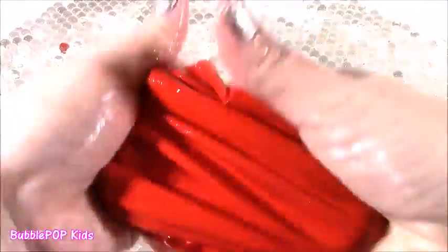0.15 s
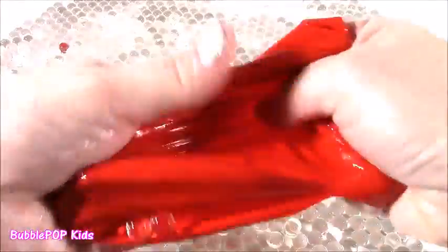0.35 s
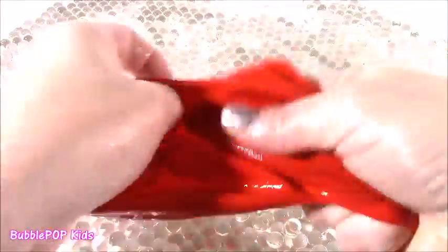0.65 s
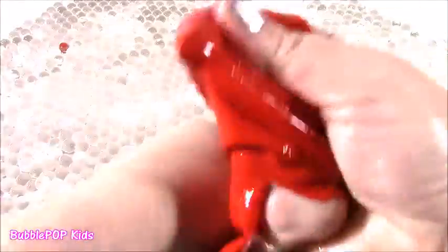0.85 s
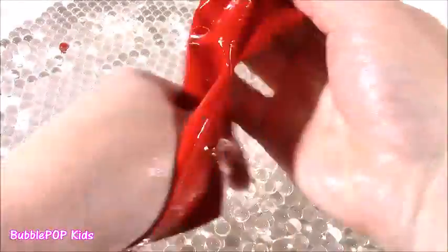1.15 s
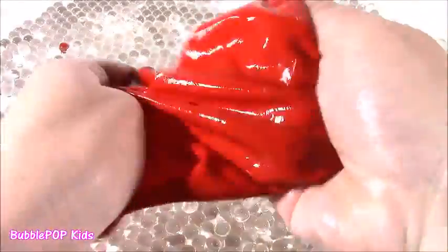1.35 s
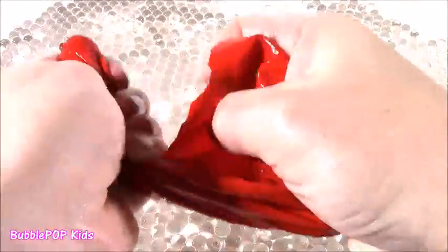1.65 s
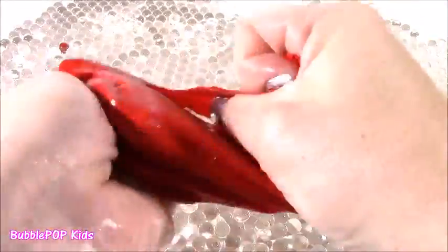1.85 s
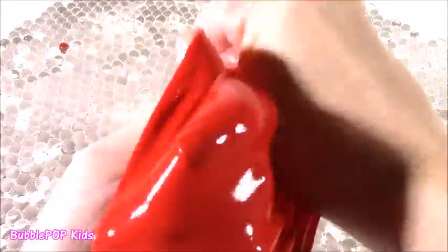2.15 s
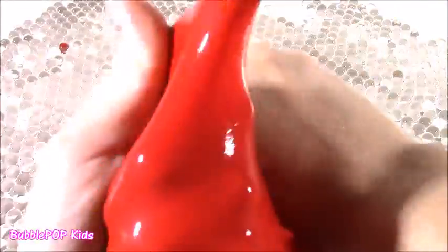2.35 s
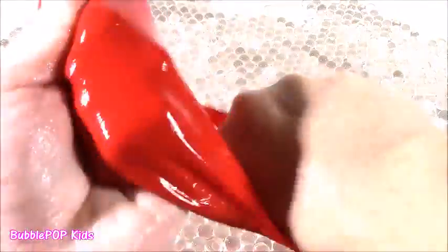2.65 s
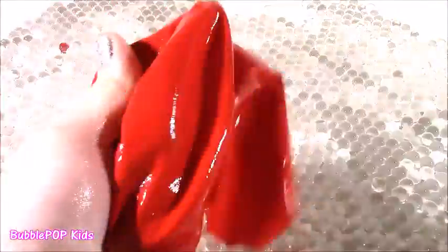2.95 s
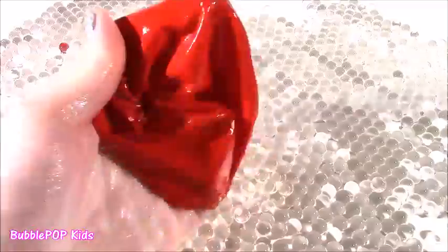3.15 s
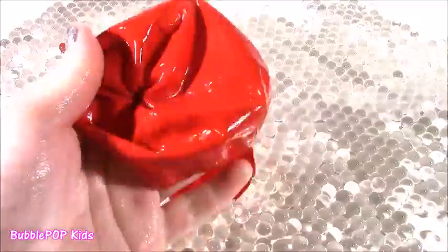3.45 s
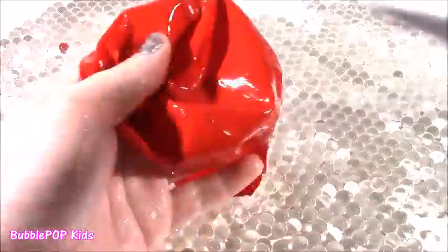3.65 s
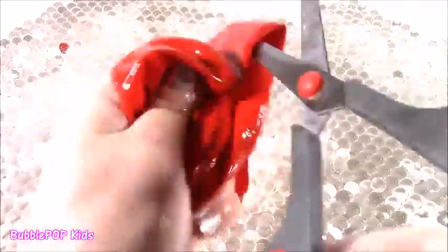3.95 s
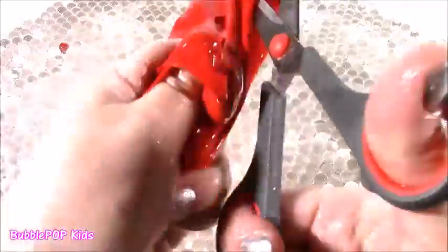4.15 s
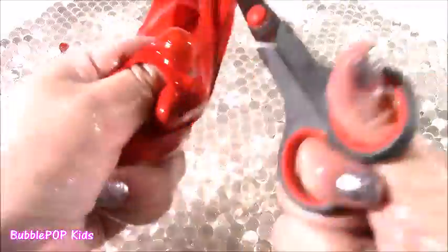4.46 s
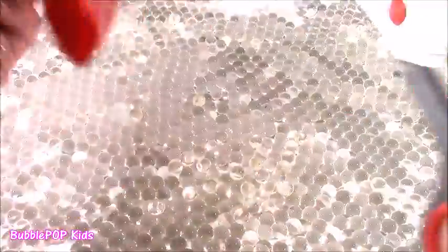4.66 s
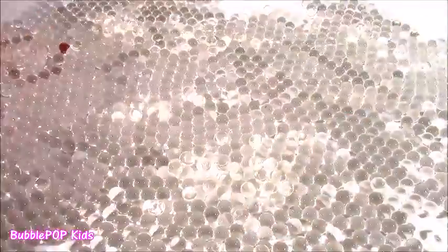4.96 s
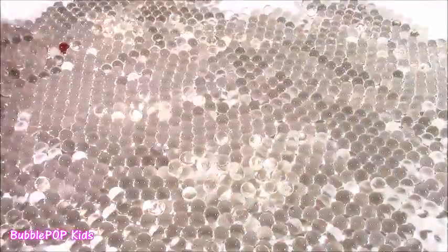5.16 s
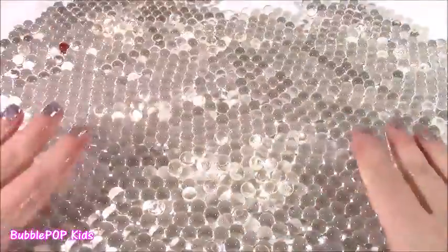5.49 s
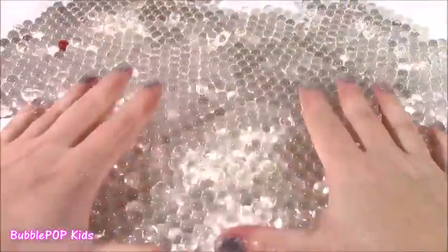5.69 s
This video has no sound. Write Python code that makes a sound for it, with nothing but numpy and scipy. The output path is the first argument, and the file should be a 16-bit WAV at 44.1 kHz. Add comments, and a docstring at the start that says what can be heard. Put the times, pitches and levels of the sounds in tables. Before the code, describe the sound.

Very close and nearly mono in a small quiet room, wet hands knead a limp rubber balloon: dull flexing, sticky rubbing, fine crackle, bright snaps and small squelches. Around three seconds the scissors knock and scrape on a hollow table, then tick and bite through the rubber. They clatter down sharply at five seconds, and quiet room tone with faint hiss follows.

```python
"""Wet hands knead a slack balloon that held water beads: its rubber flexes, rubs, snaps and squelches.
Slips and releases are filtered pulses and noise; each squelch adds a short sine for the flopping skin.
Scissors knock and scrape on a hollow table, by noise and decaying modes, snip the rubber and clatter down.
The sound is near and almost mono in a small room, over low room tone; faint hiss swells at the very end."""
import sys
import numpy as np
from scipy import signal
from scipy.fft import rfft, irfft, next_fast_len
from scipy.io import wavfile
from scipy.ndimage import map_coordinates

SR = 44100
rng = np.random.default_rng(int(sys.argv[2]) if len(sys.argv) > 2 else 0)


def generate_wav(signal):
    """Clip the signal to [-1, 1] and save it as 16-bit WAV at the path in sys.argv[1]."""
    frames = np.transpose(np.atleast_2d(signal))
    scaled = np.clip(frames, -1, 1) * 32767
    pcm = np.round(scaled).astype(np.int16)
    wavfile.write(sys.argv[1], SR, pcm)


N = 256882  # length in samples

# Grip on the balloon between squeezes, until it is put away: [start_s, rub_level_db]
GRIP_LEVEL = [(0, -56), (1.35, -53.5), (1.87, -61), (2.1, -58.5), (2.45, -69), (2.85, -56.5), (3.14, -65.5),
              (3.7, -65.5), (4.3, -64), (4.88, -71), (5.0, -58.5), (5.05, -85)]
# Squeezes and tugs, each building to a peak and letting go:
# [peak_s, build_s, release_s, flex_level_db, rub_level_db, crackle_level_db]
SQUEEZES = [(0.102, 0.072, 0.089, -46, -48.5, -68.5), (0.18, .02, .05, -48, -42.5, -46.5),
            (0.48, .38, .06, -44.5, -42.5, -43), (0.569, 0.056, 0.064, -71, -48.5, -41.5),
            (0.658, .06, .09, -41, -42.5, -49), (0.73, .14, .10, -45.5, -43, -37),
            (0.822, .025, .05, -70, -42, -38), (1.012, .11, 0.099, -50, -47.5, -50.5),
            (1.281, .22, .15, -44.5, -41.5, -53), (1.52, 0.27, 0.056, -44.5, -44, -47.5),
            (1.699, 0.26, 0.078, -48, -44, -45.5), (1.79, 0.058, .06, -52.5, -44.5, -43),
            (1.96, .06, .03, -49, -43.5, -52), (2.05, .04, .11, -47.5, -48, -43.5),
            (2.172, .03, .06, -45, -50.5, -57), (2.268, .05, 0.18, -66, -48, -41.5),
            (2.578, .02, .10, -57, -48, -43), (2.68, 0.065, 0.046, -53, -34.5, -36.5),
            (2.75, 0.12, .06, -42.5, -42.5, -43), (2.85, 0.078, 0.14, -47.5, -49, -42.5),
            (2.99, 0.11, .15, -39.5, -42, -48), (3.43, .28, 0.27, -54.5, -46, -45.5),
            (4.06, 0.031, 0.12, -53, -42.5, -41.5), (4.129, 0.095, 0.02, -69, -52, -52),
            (4.191, 0.02, 0.033, -52, -47, -51), (4.47, 0.085, 0.061, -44.5, -39, -41),
            (4.62, 0.043, 0.14, -68, -66, -43), (4.72, 0.2, 0.097, -45, -39, -53),
            (4.83, 0.022, 0.11, -72, -50.5, -52)]
# Spectrum of the dully flexing skin: [frequency_hz, density_db]
FLEX_SPECTRUM = [(25, -34), (70, -24.5), (130, -12), (280, -3.5), (420, -1), (750, -8.5), (1300, -12),
                 (2500, -17), (6000, -55)]
# Spectrum of wet fingers rubbing rubber: [frequency_hz, density_db]
RUB_SPECTRUM = [(200, -43), (700, -3), (1400, -2), (2600, -3.5), (3800, 1.5), (5200, -1), (8000, -16.5),
                (16000, -29)]
# Spectrum of fingers coming off the rubber in fine crackle: [frequency_hz, density_db]
CRACKLE_SPECTRUM = [(800, -44.5), (3000, -12), (5000, -5.5), (7500, -5.5), (12500, 0), (16000, -7)]
# Spectrum of the room tone: [frequency_hz, density_db]
ROOM_TONE_SPECTRUM = [(25, -25), (70, -24.5), (160, -10.5), (270, -5.5), (450, -3), (900, -9),
                      (2000, -15.5), (5000, -20.5), (16000, -34)]
# Spectrum of the microphone hiss: [frequency_hz, density_db]
HISS_SPECTRUM = [(200, -6.5), (800, -30), (3000, 0.5), (9000, -3.5), (13000, -7), (16000, -11)]
# Hiss, swelling at the end: [start_s, level_db]
HISS_LEVEL = [(5.57, -87), (5.61, -58), (5.82, -57.5)]
# Span in which both hands work the rubber: (start_s, end_s)
KNEADING_SPAN = (0.055, 3.05)
# Single wet folds of rubber pulling apart: [start_s, level_db, centre_hz, width_octaves]
SNAPS = [(0.0963, -34, 2730, 0.53), (0.1735, -27.5, 13300, .18), (0.2619, -32, 3390, 1.4),
         (0.3654, -23, 11500, 0.32), (0.3737, -30.5, 11600, 1.1), (0.4135, -26, 6860, 0.79),
         (0.4652, -29, 5450, 0.67), (0.4899, -22, 6380, 0.92), (0.5683, -22.5, 4800, 0.33),
         (0.5813, -30, 8550, 0.46), (0.735, -16, 11900, .18), (0.7365, -18, 9300, 0.42),
         (0.778, -23.5, 10000, 0.53), (0.8144, -27, 7630, 0.64), (0.9189, -14, 7500, 0.31),
         (1.0089, -32.5, 4650, 0.62), (1.0527, -32, 5500, 0.72), (1.1988, -32, 9650, 0.62),
         (1.2225, -21.5, 12100, .15), (1.2669, -22, 3140, 0.29), (1.2755, -18.5, 2490, .16),
         (1.3075, -27.5, 2750, 0.41), (1.3802, -31.5, 4260, 0.23), (1.4457, -27, 3400, 0.27),
         (1.62, -29.5, 3560, 0.37), (1.755, -31.5, 3300, 0.47), (1.6408, -25, 7090, 0.58),
         (1.7805, -29, 5500, .48), (1.7926, -28, 4680, 1.4), (2.0182, -12.5, 7340, 0.46),
         (2.0249, -20, 8500, .35), (2.0451, -19.5, 3940, 0.55), (2.1166, -36, 3800, 0.92),
         (2.1999, -29, 10000, 0.42), (2.4367, -37, 10310, 0.55), (2.481, -32, 3570, 0.44),
         (2.6117, -26.5, 3480, 0.85), (2.6456, -27.5, 5100, 0.18), (2.6698, -23.5, 7750, .3),
         (2.7419, -23.5, 5200, .17), (2.8407, -17.5, 5640, 1.4), (2.8971, -27, 4000, 0.15),
         (2.9798, -19.5, 2960, 0.78)]
# Single pockets of air and water squeezed out, before the common lift: [start_s, level_db, centre_hz]
SQUELCHES = [(0.184, -32, 545), (0.221, -31.5, 1040), (0.235, -32, 1720), (0.402, -27.5, 495),
             (0.414, -27.5, 556), (0.473, -27, 470), (0.633, -29, 1210), (0.657, -17.5, 1800),
             (0.666, -21.5, 1160), (0.716, -23, 1570), (1.276, -25, 1850), (1.308, -28.5, 1260),
             (1.415, -32.5, 460), (1.523, -30.5, 950), (1.564, -26, 1210), (1.962, -27.5, 670),
             (2.045, -23.5, 1680), (2.171, -24.5, 1100), (2.174, -24, 1240), (2.579, -34.5, 1220),
             (2.679, -28.5, 810), (2.8405, -27.5, 1550), (2.937, -27.5, 1320), (2.979, -25, 1650),
             (3.256, -27, 856), (3.842, -39.5, 1210), (3.955, -37, 920), (4.306, -30, 610),
             (4.46, -30.5, 1630), (4.716, -28, 1890)]
# Scissors striking the table, before the common lift:
# [start_s, level_db, brightness_hz, board_ring_db, steel_ring_db]
KNOCKS = [(3.175, -17, 2020, 2, -9), (5.032, -8, 13700, -4.5, -1), (5.0604, -18.5, 4500, -17, -6),
          (5.3215, -18.5, 10400, -6.5, -17), (5.3311, -19.5, 10200, -24, -10),
          (5.335, -17.5, 7500, -9, -12), (5.376, -33.5, 14000, -14, -18), (5.504, -41.5, 2500, -7, -22)]
# Spectrum of the contact between scissors and table: [frequency_hz, density_db]
CONTACT_SPECTRUM = [(30, -46), (110, -34), (220, -15), (500, -5.5), (800, -15.5), (1300, -2), (1650, -0.5),
                    (2300, 1), (2900, 9), (3500, -2), (4600, 1.5), (7000, -7.5), (11000, -8.5), (16000, -7)]
# Modes of the table board, before damping by the cloth: [frequency_hz, level_db, t60_s]
BOARD_MODES = [(188, -17, .14), (226, -16, .14), (385, -12, .15), (437, -10, .11), (481, -12, .16),
               (637, -10, .17), (735, -6, .06), (1051, -2, .1), (1185, -7, .1), (1415, -3, .085),
               (1545, -14, .1), (1835, -7, .07)]
# Modes of the scissors, before damping by the cloth: [frequency_hz, level_db, t60_s]
STEEL_MODES = [(997, -9, .2), (1059, 0, .125), (2010, -8, .05), (2555, -9, .14), (2770, -7, .14),
               (2875, -8, .14), (2942, -6, .12), (3093, -8, .11), (4680, -15, .1), (6410, -11, .055),
               (8211, -22, .14)]
# Blades ticking and biting through rubber: [start_s, level_db, centre_hz, width_octaves]
SNIPS = [(3.2541, -27.5, 2740, 0.53), (3.3491, -22.5, 5130, 0.63), (3.4474, -23.5, 7100, 0.43),
         (3.486, -25.5, 6100, 0.7), (3.5659, -31.5, 6000, 0.75), (4.002, -39.5, 5970, 1.4),
         (4.0657, -27.5, 9400, .72), (4.1254, -32, 4900, .18), (4.1823, -30, 4570, .16),
         (4.2, -32, 4670, .13), (4.2626, -40, 5360, 1.5), (4.3629, -31, 10300, 0.53),
         (4.3983, -36, 5250, 0.49), (4.4618, -22, 6500, 1.1), (4.4668, -21.5, 5800, .6),
         (4.5032, -27.5, 11000, 0.39), (4.6187, -28, 3900, 0.57), (4.639, -31.5, 9690, 1.4),
         (4.695, -6, 4450, .17), (4.7168, -21, 4800, 0.62), (4.8168, -32.5, 5400, 0.37),
         (4.9326, -37.5, 4190, .15), (5.2847, -35.5, 3150, 0.27)]
# Scissors sliding on the table: [start_s, length_s, level_db]
SLIDES = [(3.266, 0.18, -38.5), (5.192, 0.017, -47), (5.305, 0.01, -42.5)]
# Spectrum of the scrape: [frequency_hz, density_db]
SCRAPE_SPECTRUM = [(100, -59), (400, -3.5), (850, 0), (1050, 2.5), (1300, -1.5), (2150, -1.5), (2550, 8),
                   (3100, -8), (7000, -12), (16000, -30)]
# Decay of the room: [frequency_hz, t60_s]
ROOM_DECAY = [(150, 0.28), (600, 0.3), (3000, 0.088), (8000, 0.24), (16000, 0.079)]

SWELL_DB = 20  # change of level over one build or release time
HOLD_FLEX_DB, HOLD_CRACKLE_DB = -1, -7.5  # held balloon, relative to its rubbing
FIRM_DB = -50.5  # rubbing level of an ordinary firm grip
SLIDE_ATTACK_S, SLIDE_RELEASE_S = .018, 0.047  # time to gain or lose SWELL_DB
BOARD_LOW_HZ = 97  # the board radiates little below this
TOP_HZ = 16200  # upper band limit


def amp(db):
    """Decibel law: level to amplitude gain."""
    return 10 ** (np.asarray(db) / 20)


def unit(x):
    """Power normalisation: scale to rms 1."""
    return x / np.sqrt(np.mean(x ** 2) + 1e-20)


def along(points, hz):
    """Interpolation over logarithmic frequency, through (frequency, value) points."""
    frequency, value = np.transpose(points)
    return np.interp(np.log(hz + 1), np.log(frequency + 1), value)


def curves(rows):
    """Linear interpolation in time: one curve for each column after the first."""
    times, *columns = np.transpose(rows)
    return [np.interp(np.arange(N) / SR, times, column) for column in columns]


def add(track, start_s, sound):
    """Superposition: mix a sound in at its start time."""
    part = track[round(start_s * SR):][:len(sound)]
    part += sound[:len(part)]


def wobble(rate):
    """Slow random modulation: random knots joined by lines, rate knots a second."""
    knots = rng.standard_normal(int(N * rate / SR) + 4)
    return map_coordinates(knots, [np.arange(N) * rate / SR], order=1)


def swell(start_s, hold_s, attack_s, release_s):
    """Exponential envelope: builds up to the start, holds, and dies away."""
    t = np.arange(N) / SR - start_s
    outside = np.maximum(-t / attack_s, 0) + np.maximum((t - hold_s) / release_s, 0)
    return np.exp(-np.log(10) / 20 * SWELL_DB * np.minimum(outside, 10))


def pulse(gain, size=2048):
    """Minimum phase by a folded cepstrum: the sharpest causal pulse with a given gain."""
    magnitude = gain(np.fft.rfftfreq(size, 1 / SR))
    cepstrum = irfft(np.log(np.maximum(magnitude, 1e-6)))
    cepstrum[1:size // 2] *= 2
    cepstrum[size // 2 + 1:] = 0
    return irfft(np.exp(rfft(cepstrum)))


def coloured(x, spectrum):
    """Linear filtering: shape x by a spectrum and bring it to rms 1."""
    shape = pulse(lambda hz: amp(along(spectrum, hz)))
    return unit(signal.fftconvolve(x, shape)[:len(x)])


def bell(hz, centre_hz, octaves):
    """Resonance band: a bell on a log frequency axis, tilted downward in the treble."""
    band = np.exp(-(np.log2((hz + 1) / centre_hz) / octaves / 2) ** 2)
    return band * np.sqrt(centre_hz / (hz + centre_hz / 20))


def burst(x, db):
    """Energy scaling: a short sound gets the energy of one millisecond at this level."""
    return amp(db) * x / np.linalg.norm(x) * np.sqrt(SR / 1000)


def grains(rate, spread_db):
    """Random impulse process: signed impulses of uneven size, on average rate a second."""
    size_db = spread_db * np.clip(rng.standard_normal(N), -2, 2)
    return (rng.random(N) < rate / SR) * rng.choice([-1, 1], N) * amp(size_db)


def effort():
    """Power addition: the steady grip plus every squeeze, as flex, rub and crackle levels in dB."""
    hold_gain = amp(curves(GRIP_LEVEL)[0])
    power = np.outer(amp([HOLD_FLEX_DB, 0, HOLD_CRACKLE_DB]), hold_gain) ** 2
    for peak_s, build_s, release_s, *levels_db in SQUEEZES:
        power += np.outer(amp(levels_db) ** 2, swell(peak_s, 0, build_s, release_s) ** 2)
    return 10 * np.log10(power)


def sticky(spectrum, rate, spread_db, smooth_db, clump_db, count=9):
    """Stick-slip friction: many small slips over a smooth rub, clumped band by band, partly together."""
    slips, grip = np.zeros(N), wobble(70)
    for centre_hz in np.geomspace(800, 15000, count):
        shape = pulse(lambda hz: bell(hz, centre_hz, .28))
        source = unit(grains(rate, spread_db)) + amp(smooth_db) * rng.standard_normal(N)
        clumps = amp(clump_db * (grip + wobble(90)))
        slips += signal.oaconvolve(source * clumps, shape)[:N]
    return coloured(slips, spectrum)


def handling(flex_db, rub_db, crackle_db):
    """Friction and bending: the skin flexes dully while wet fingers rub and come off it in fine crackle."""
    flex = amp(flex_db) * coloured(grains(rate=900, spread_db=5.5), FLEX_SPECTRUM)
    rub = amp(rub_db) * sticky(RUB_SPECTRUM, rate=240, spread_db=8.5, smooth_db=-7, clump_db=4.5)
    crackle = sticky(CRACKLE_SPECTRUM, rate=340, spread_db=8, smooth_db=-12, clump_db=4.5)
    return flex + rub + amp(crackle_db) * crackle


def background(tone_db, opposed_db):
    """Stationary noise: centred hiss, low room tone, and fainter noise of opposite sign in the channels."""
    hiss = amp(curves(HISS_LEVEL)[0]) * coloured(rng.standard_normal(N), HISS_SPECTRUM)

    def tone():
        """Filtered random pressure: one independent stretch of noise."""
        return amp(tone_db) * coloured(rng.standard_normal(N), ROOM_TONE_SPECTRUM)

    return tone() + hiss + np.outer([1, -1], amp(opposed_db) * tone())


def small_releases(rub_db, level_db, follows, spread_db, centre_hz, octaves, count):
    """Work-driven chance: [start_s, level_db, centre_hz], denser and louder under a firmer grip."""
    first, last = (round(s * SR) for s in KNEADING_SPAN)
    work = np.cumsum(amp(rub_db[first:last]))
    # one random moment in each equal share of the work
    shares = (np.arange(count) + rng.random(count)) / count
    at = first + np.searchsorted(work, work[-1] * shares)
    size, pitch = np.clip(rng.standard_normal((count, 2)), -2, 2).T
    levels_db = level_db + follows * (rub_db[at] - FIRM_DB) + spread_db * size
    return np.transpose([at / SR, levels_db, centre_hz * 2 ** (octaves * pitch)])


def clicks(rows, skirt_db, after_db, after_t60, lead_db, lead_t60):
    """Sudden release: a sharp pulse and a stutter of smaller slips, with brief faint noise before."""
    out, lead = np.zeros(N), SR // 100
    t = np.arange(-lead, SR // 30) / SR
    for start_s, db, centre_hz, octaves in rows:
        noise = rng.standard_normal(len(t)) * rng.exponential(size=len(t))
        lead_noise = noise * (t < 0) * amp(-60 * abs(t) / lead_t60)
        stutter = noise * (t > 0) * amp(-60 * abs(t) / after_t60)
        force = (t == 0) + amp(lead_db) * lead_noise / np.linalg.norm(lead_noise)
        force += amp(after_db) * stutter / np.linalg.norm(stutter)
        width = np.clip(octaves, .2, 1.2)
        # the skirt is a broad floor beneath the band
        shape = pulse(lambda hz: bell(hz, centre_hz, width) + amp(skirt_db) * (hz / (hz + 200)) ** 2)
        add(out, start_s - lead / SR, burst(np.convolve(force, shape), db))
    return out


def snaps(rub_db):
    """Adhesive release: wet folds of rubber pull apart, with small ticks from the kneading."""
    ticks = small_releases(rub_db, level_db=-37.0, follows=0.19, spread_db=0.5,
                           centre_hz=5500, octaves=1.0, count=28)
    folds = list(SNAPS) + [(s, db, hz, .6) for s, db, hz in ticks]
    return clicks(folds, skirt_db=-19, after_db=-4, after_t60=0.011, lead_db=-13.5, lead_t60=0.0029)


def squelches(rub_db, octaves, edge_hz, low_hz, gurgle_db, gurgle_t60, flop_db, flop_hz, flop_t60):
    """Pressure release: pockets pop and gurgle, muffled by the rubber, whose skin flops back."""
    pockets = small_releases(rub_db, level_db=-39, follows=0.36, spread_db=3.0,
                             centre_hz=1220, octaves=0.43, count=11)
    out, t = np.zeros(N), np.arange(SR // 15) / SR
    for start_s, db, centre_hz in [*SQUELCHES, *pockets]:
        gurgle = rng.standard_normal(len(t)) * amp(-60 * t / gurgle_t60)
        gurgle *= amp(gurgle_db) / np.linalg.norm(gurgle)
        gurgle[0] = 1  # the pop
        shape = pulse(lambda hz: bell(hz, centre_hz, octaves) / np.hypot(1, (hz / edge_hz) ** 8))
        add(out, start_s, burst(np.convolve(gurgle, shape), db))
        skin_hz = flop_hz * np.exp(rng.normal(0, 0.35))
        skin = np.sin(2 * np.pi * skin_hz * t) * amp(-60 * t / flop_t60)
        add(out, start_s, burst(skin, db + flop_db))
    # so small a skin radiates little bass
    return amp(1.34) * signal.lfilter(*signal.butter(2, low_hz, "high", fs=SR), out)


def ring(modes, t):
    """Modal superposition: decaying sines with random phases and slightly varied levels."""
    total = np.zeros(len(t))
    for hz, level_db, t60 in modes:
        decay = amp(level_db + rng.normal(0, 1) - 60 * t / t60)
        total += decay * np.sin(2 * np.pi * (hz * t + rng.random()))
    return total


def knocks(crack_t60, rattle_db, rattle_t60, ring_db, cloth_t60):
    """Impact excitation: scissors hit the table with a crack, a rattle, and the ring of board and steel."""
    out, t = np.zeros(N), np.arange(SR // 2) / SR
    for start_s, db, bright_hz, board_db, steel_db in KNOCKS:
        fade = amp(-60 * t / crack_t60) + amp(rattle_db - 60 * t / rattle_t60)
        blow = fade * coloured(rng.standard_normal(len(t)), CONTACT_SPECTRUM)
        ringing = amp(board_db) * ring(BOARD_MODES, t) + amp(steel_db) * ring(STEEL_MODES, t)
        # the cloth damps the ring further
        blow += amp(ring_db - 60 * t / cloth_t60) * ringing
        # the contact takes a moment to build up; a padded one loses its treble
        blow *= 1 - np.exp(-t / .0003)
        softness = signal.butter(4, min(bright_hz, SR / 2.2), fs=SR)
        add(out, start_s, amp(db + 1.5) * signal.lfilter(*softness, blow))
    return signal.lfilter(*signal.butter(2, BOARD_LOW_HZ, "high", fs=SR), out)


def snips():
    """Fracture and contact: scissor blades tick and bite through rubber."""
    return clicks(SNIPS, skirt_db=-22.5, after_db=2.0, after_t60=0.013, lead_db=-10.5, lead_t60=0.0022)


def slide():
    """Sliding friction: the scissors judder over the sequinned cloth and stir the board."""
    judder = amp(6.0 * wobble(60)) * grains(rate=2700, spread_db=5)
    push = np.zeros(N)
    for start_s, length_s, db in SLIDES:
        push += amp(db) * swell(start_s, length_s, SLIDE_ATTACK_S, SLIDE_RELEASE_S)
    return push * coloured(judder, SCRAPE_SPECTRUM)


def room(x, wet_db, side_db):
    """Diffuse reverberation: a short tail of decaying noise, nearly the same in both channels."""
    hz, t, z = signal.stft(rng.standard_normal((2, SR // 3)), SR, nperseg=256)
    decay = amp(-60 * t / along(ROOM_DECAY, hz)[:, None])
    tail = signal.istft(z * decay, SR, nperseg=256)[1]
    # the tail is set back by 2 ms
    tail = np.pad(tail / np.linalg.norm(tail[0]), ((0, 0), (SR // 500, 0)))
    mid, side = amp(wet_db) * signal.fftconvolve(x[None], tail, axes=1)[:, :N]
    return np.array([x + mid + amp(side_db) * side, x + mid - amp(side_db) * side])


def lean(pair, depth, shadow_hz):
    """Interchannel level difference: the treble leans randomly a little to one side or the other."""
    treble = signal.lfilter(*signal.butter(1, shadow_hz, "high", fs=SR), pair.mean(axis=0))
    return pair + np.outer([1, -1], depth * wobble(40) * treble)


def scene():
    """Direct-to-reverberant balance: balloon and blades close, the table a little further off."""
    flex_db, rub_db, crackle_db = effort()
    wet = squelches(rub_db, octaves=0.86, edge_hz=3900, low_hz=159, gurgle_db=1.0, gurgle_t60=0.021,
                    flop_db=-7.0, flop_hz=300.0, flop_t60=0.077)
    near = handling(flex_db, rub_db, crackle_db) + snaps(rub_db) + wet + snips()
    table = knocks(crack_t60=0.016, rattle_db=-24.5, rattle_t60=0.27, ring_db=-9.5, cloth_t60=0.41)
    table += slide()
    pair = room(near, wet_db=-18.0, side_db=-22) + room(table, wet_db=-7.5, side_db=-34)
    return lean(pair, depth=0.14, shadow_hz=3000) + background(tone_db=-57.0, opposed_db=-9)


def record(dry):
    """Saturation and band limiting: high peaks are rounded off and the top of the spectrum cut steeply."""
    rounded = dry / (1 + np.abs(dry / .9) ** 6) ** (1 / 6)
    size = next_fast_len(N + SR // 2)
    hz = np.fft.rfftfreq(size, 1 / SR)
    spectrum = rfft(rounded, size) / np.hypot(1, (hz / TOP_HZ) ** 70)
    return irfft(spectrum, size)[:, :N]


dry = scene()
out = record(dry)
generate_wav(out)
```